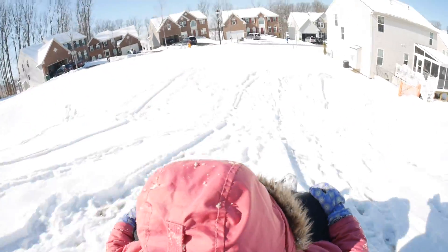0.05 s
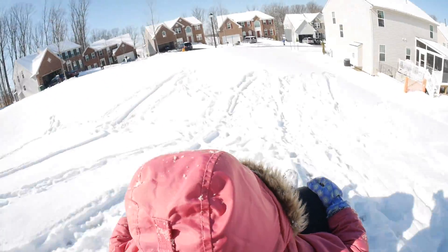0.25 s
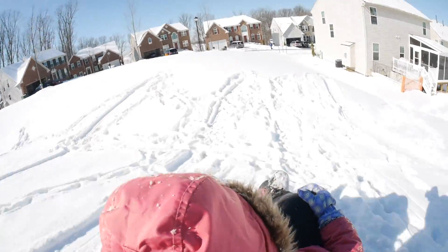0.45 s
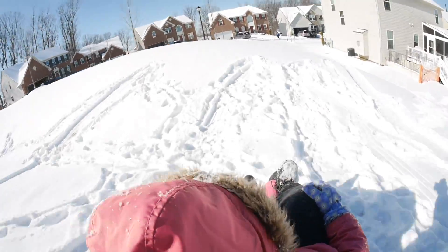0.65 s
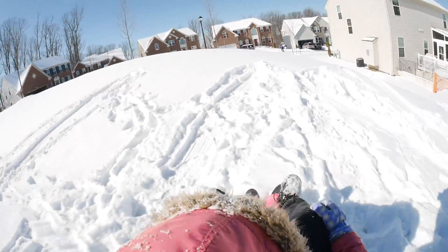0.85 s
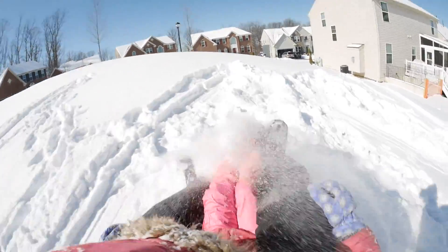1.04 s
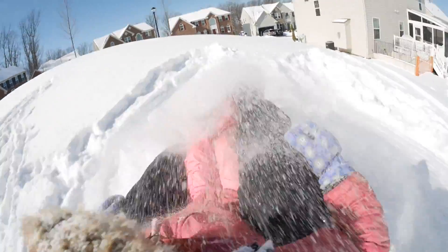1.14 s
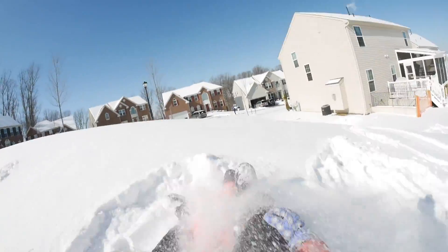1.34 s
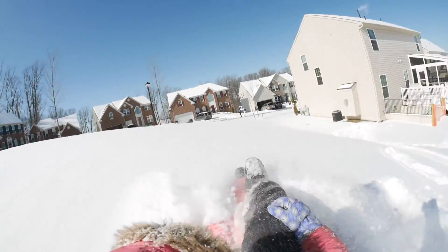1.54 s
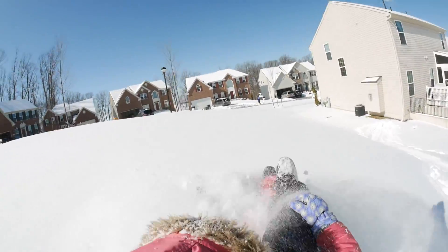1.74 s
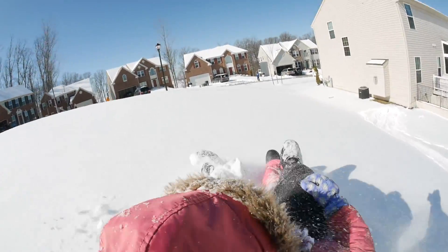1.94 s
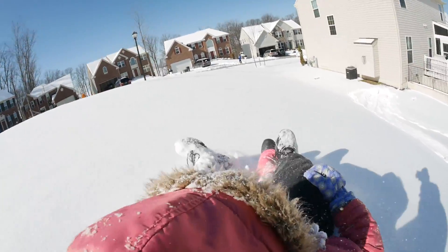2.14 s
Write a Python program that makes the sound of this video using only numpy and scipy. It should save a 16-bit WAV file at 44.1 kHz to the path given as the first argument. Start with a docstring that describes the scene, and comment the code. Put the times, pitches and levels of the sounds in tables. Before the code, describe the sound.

Sled sliding fast on snow, with dense crunching, icy cracks and a light powder hiss.

```python
"""Sled hull running fast downhill on powder snow, heard from the rider's seat.
Snow packs and crunches under it in dense grains over a low drumming, with icy snaps and sharper
crust cracks. The sled goes light over a bump near 1.35 s. Powder thrown up by boots hisses past;
small clumps patter on the microphone housing. Each source is a train of filtered random clicks."""
import sys
import numpy as np
from scipy import signal
from scipy.fft import rfft, irfft, next_fast_len
from scipy.io import wavfile
from scipy.ndimage import uniform_filter1d, minimum_filter1d

SR = 44100
rng = np.random.default_rng(int(sys.argv[2]) if len(sys.argv) > 2 else 0)


def transcribe(signal):
    """Save signal, clipped to [-1, 1], as a 16-bit WAV file at the path in sys.argv[1]."""
    frames = np.atleast_2d(signal).T
    limited = np.clip(frames, -1, 1)
    pcm = np.round(limited * 32767).astype(np.int16)
    wavfile.write(sys.argv[1], SR, pcm)


N = 96623

# snow load under the hull (time [s], level [dB])
LOAD_LEVEL = [(0, -25.5), (.07, -25), (.11, -19), (.185, -17.5), (.21, -22), (.29, -17.5), (.36, -18.5),
              (.42, -19.5), (.51, -20.5), (.57, -21), (.61, -20.5), (.675, -20), (.715, -22.5), (.80, -20),
              (.845, -14.5), (.885, -19.5), (.91, -21), (.97, -22), (1.01, -19.5), (1.04, -21.5),
              (1.09, -17), (1.18, -20.5), (1.26, -24), (1.30, -29), (1.36, -31.5), (1.42, -26.5),
              (1.46, -22.5), (1.55, -21.5), (1.585, -23), (1.63, -21), (1.69, -19.5), (1.72, -21.5),
              (1.83, -25.5), (1.92, -24.5), (2.0, -26), (2.065, -16), (2.10, -23), (2.19, -21.5)]
# crisp part of the crunch (time [s], level [dB])
CRUNCH_LEVEL = [(0, -59), (.085, -62), (.12, -31), (.19, -34.5), (.27, -42), (.33, -31), (.41, -27.5),
                (.47, -31.5), (.51, -24.5), (.56, -35.5), (.63, -32.5), (.67, -25.5), (.72, -28.5),
                (.80, -30.5), (.835, -20.5), (.88, -32.5), (1.0, -28.5), (1.06, -28), (1.11, -22),
                (1.18, -24), (1.23, -33), (1.29, -43), (1.37, -55), (1.45, -46), (1.58, -44.5),
                (1.63, -26.5), (1.69, -37), (1.80, -52), (1.92, -53), (2.0, -49), (2.05, -35),
                (2.11, -41.5), (2.19, -49)]
# airborne powder (time [s], level [dB])
POWDER_LEVEL = [(0, -50), (.2, -62), (.26, -63), (.7, -67.5), (.95, -66), (1.045, -59), (1.08, -49.5),
                (1.17, -48), (1.21, -57), (1.27, -52), (1.38, -48), (1.45, -42), (1.52, -46.5),
                (1.6, -51.5), (1.66, -57.5), (1.85, -53), (2.0, -54), (2.19, -60)]
# clumps landing on the housing, plus one longer burst of boot spray at 1.062 s (time [s], level [dB], decay
# [s])
CLUMP_HITS = [(.015, -25.5, 0.0017), (.039, -22, 0.0029), (0.047, -31, 0.0089), (0.0551, -15, 0.0015),
              (0.069, -30.5, 0.0036), (0.108, -32, 0.0038), (0.115, -39.5, 0.0057), (0.129, -43, 0.0031),
              (0.151, -36, 0.0044), (.167, -33, .007), (0.177, -24.5, 0.0036), (.185, -29, 0.0035),
              (0.196, -40, 0.0055), (0.204, -32, 0.0064), (.215, -49, .005), (0.282, -34.5, 0.0027),
              (0.298, -44, .003), (0.31, -44.5, 0.0032), (.390, -57, .004), (0.422, -46.5, .007),
              (.500, -54, 0.011), (0.979, -43, 0.0042), (0.99, -44, .003), (.996, -29.5, 0.0023),
              (1.008, -38.5, 0.0035), (1.062, -41.5, 0.024), (1.102, -32, .002), (1.111, -29, 0.0025),
              (1.135, -32, 0.0053), (1.146, -28.5, 0.0027), (1.162, -31, 0.0097), (1.176, -64.5, .004),
              (1.403, -39, 0.0037), (1.443, -30.5, 0.002), (1.452, -35, .005), (1.481, -37, .003),
              (1.585, -27.5, 0.002), (1.593, -31.5, 0.0038), (1.603, -40, 0.0036), (1.617, -46, .004),
              (1.915, -40, 0.0022), (1.921, -42, 0.0027)]
# crust breaking under the hull (time [s], level [dB], decay [s])
CRUST_BREAKS = [(.111, -16.5, 0.0089), (.392, -39, .003), (0.454, -17, 0.004), (0.486, -18, 0.0045),
                (0.501, -12, .002), (0.66, -17.5, 0.015), (0.694, -33, 0.0016), (0.829, -16, 0.0037),
                (0.845, -17, 0.0048), (0.898, -12, .003), (0.933, -14, 0.0065), (1.158, -10, 0.004),
                (1.174, -24, 0.0076), (1.203, -36, .002), (1.462, -11, 0.0024), (1.498, -11, 0.0035),
                (1.533, -14, 0.0017), (1.729, -19, .003), (1.839, -21, .004), (2.023, -12.5, 0.0027)]

# dull packing snow (frequency [Hz], relative gain [dB])
PACK_SPECTRUM = [(25, -36), (60, -29), (130, -33), (250, -8.5), (380, -1.5), (520, 1.5), (800, -1.5),
                 (1200, -6.5), (1800, -17.5), (2800, -58), (5000, -63), (14000, -69)]
# crisp crunch (frequency [Hz], relative gain [dB])
CRUNCH_SPECTRUM = [(200, -40), (700, -3.5), (1400, 2.5), (2100, -5), (2900, -16.5), (4000, -30.5),
                   (6000, -41), (10000, -68), (14000, -124)]
# hull drumming (frequency [Hz], relative gain [dB])
DRUM_SPECTRUM = [(20, -39), (50, -27.5), (90, -16.5), (150, -4.5), (260, 1.5), (380, 0.5), (700, -23),
                 (2000, -68.5)]
# powder hiss (frequency [Hz], relative gain [dB])
POWDER_SPECTRUM = [(1000, 4), (3000, -7), (4500, -8), (5300, -6), (6200, -7), (7400, -6), (8600, -11),
                   (10000, -3), (11000, -7.5), (12500, -10.5), (14000, -20), (15000, -37)]
# icy grain snap (frequency [Hz], relative gain [dB])
SNAP_SPECTRUM = [(500, -20), (1300, 5), (2300, 3.5), (3000, -11.5), (4000, -22), (7000, -34.5),
                 (14000, -53)]
# housing resonances (frequency [Hz], relative gain [dB])
HOUSING_SPECTRUM = [(1500, -16), (4100, -19), (5200, -4.5), (6000, -11), (7400, 1.5), (8500, -8),
                    (9000, -5), (9300, -6.5), (9850, 4.5), (10120, -4), (10400, 3.5), (10900, 2.5),
                    (11600, -4), (12000, -9), (12900, -17), (13500, -19), (14100, -42), (15500, -54)]
# breaking crust (frequency [Hz], relative gain [dB])
CRUST_SPECTRUM = [(60, -29.5), (250, 17), (700, 10.5), (1500, 3.5), (2500, -14.5), (4000, -27),
                  (7000, -37.5), (14000, -57)]

SLIP_HZ, PACK_SLIP_DB, CRUNCH_SLIP_DB = 94, 2, 3
PACK_DB, DRUM_DB, SNAP_DB = 0.05, -6, -22   # re LOAD_LEVEL
CRUNCH_DB = 1.5   # re CRUNCH_LEVEL
HULL_PAN_DB, CLUMP_PAN_DB = -0.47, 2   # left minus right
LIMIT_DB, LIMIT_S, FADE_S, CUTOFF_HZ = -3.8, 0.004, 0.0028, 14600


def from_db(db):
    """Decibels to gain."""
    return 10 ** (np.asarray(db) / 20)


def unit_rms(x):
    """Scale to rms 1."""
    return x / np.sqrt(np.mean(x ** 2) + 1e-20)


def curve(rows):
    """Interpolate (time [s], value) rows at every sample."""
    return np.interp(np.arange(N) / SR, *np.transpose(rows))


def drift(corner_hz):
    """Two-pole low-passed noise, rms 1."""
    pole = np.exp(-2 * np.pi * corner_hz / SR)
    smooth = signal.lfilter([1], [1, -2 * pole, pole * pole], rng.standard_normal(2 * N))
    return unit_rms(smooth[N:])


def coloured(x, spectrum):
    """Minimum-phase filter with the given spectrum, unit power gain."""
    size = 2 * next_fast_len(N)
    hz, db = np.transpose(spectrum)
    bins_hz = np.linspace(1, SR / 2, size // 2 + 1)
    gain = unit_rms(from_db(np.interp(np.log(bins_hz), np.log(hz), db)))
    cepstrum = irfft(np.log(gain))
    cepstrum[1:size // 2] *= 2   # fold onto positive time
    cepstrum[size // 2 + 1:] = 0
    return irfft(rfft(x, size) * np.exp(rfft(cepstrum)))[..., :N]


def grains(per_s, spread_db, side_db):
    """Random stereo clicks of uneven size and direction; mid rms 1."""
    onsets = rng.random(N) < per_s / SR
    sizes = from_db(spread_db * np.minimum(rng.exponential(1, N), 4))
    signs = rng.choice([-1, 1], N)
    side = from_db(side_db) * rng.standard_normal(N)
    return unit_rms(onsets * sizes * signs) * (1 + side * [[1], [-1]])


def panned(x, pan_db):
    """Stereo balance; positive is left."""
    return x * from_db(pan_db * np.array([[.5], [-.5]]))


def burst(start_s, decay_s):
    """Instant attack, exponential decay."""
    age_s = np.arange(N) / SR - start_s
    return (age_s >= 0) * np.exp(-np.clip(age_s / decay_s, 0, 20))


def hull():
    """Snow gives way in uneven slips that bunch packing and crunch grains; the hull drums below."""
    slips = np.clip(drift(SLIP_HZ), -2, 2)
    load_db = curve(LOAD_LEVEL)
    pack = grains(per_s=2600, spread_db=2.5, side_db=-17) * unit_rms(from_db(PACK_SLIP_DB * slips))
    crunch = grains(per_s=1100, spread_db=2.6, side_db=-8.5) * unit_rms(from_db(CRUNCH_SLIP_DB * slips))
    drumming = grains(per_s=1800, spread_db=3.26, side_db=-16.5)
    return (coloured(pack * from_db(load_db + PACK_DB), PACK_SPECTRUM)
            + coloured(crunch * from_db(curve(CRUNCH_LEVEL) + CRUNCH_DB), CRUNCH_SPECTRUM)
            + coloured(drumming * from_db(load_db + DRUM_DB), DRUM_SPECTRUM))


def powder():
    """Fine crystals brush the microphone, dense enough to hiss."""
    crystals = grains(per_s=32000, spread_db=3, side_db=-31.5)
    return coloured(crystals * from_db(curve(POWDER_LEVEL)), POWDER_SPECTRUM)


def snaps():
    """Lone icy grains snap under the sled's weight."""
    ice = grains(per_s=100, spread_db=2.7, side_db=-18.5)
    return coloured(ice * from_db(curve(LOAD_LEVEL) + SNAP_DB), SNAP_SPECTRUM)


def clumps():
    """Each clump hits and crumbles, ringing the housing's high resonances."""
    force = sum(from_db(db) * burst(start_s, decay_s) for start_s, db, decay_s in CLUMP_HITS)
    return coloured(force * grains(per_s=11000, spread_db=0.5, side_db=-10), HOUSING_SPECTRUM)


def cracks():
    """Crust breaks in short, tight runs of grains."""
    force = sum(from_db(db) * burst(start_s, decay_s) for start_s, db, decay_s in CRUST_BREAKS)
    return coloured(force * grains(per_s=4000, spread_db=-1.5, side_db=-18), CRUST_SPECTRUM)


def scene():
    """Snow under the hull plus flying snow, stereo."""
    under_hull = hull() + cracks() + snaps()
    return panned(under_hull, HULL_PAN_DB) + powder() + panned(clumps(), CLUMP_PAN_DB)


def record(dry):
    """Smooth peak limiter, end fade, steep low-pass."""
    width = int(LIMIT_S * SR)
    peak = np.abs(dry).max(axis=0)
    held_gain = minimum_filter1d(np.minimum(1, from_db(LIMIT_DB) / (peak + 1e-9)), 2 * width)
    gain = uniform_filter1d(uniform_filter1d(held_gain, width), width)
    remaining_s = np.arange(N)[::-1] / SR
    fade = np.sin(np.pi / 2 * np.minimum(remaining_s / FADE_S, 1)) ** 2
    lowpass = signal.ellip(10, .1, 80, CUTOFF_HZ, fs=SR, output="sos")
    return signal.sosfilt(lowpass, dry * gain * fade)


dry = scene()
out = record(dry)
transcribe(out)
```